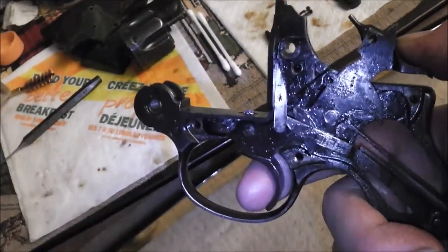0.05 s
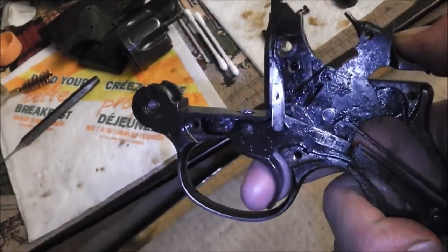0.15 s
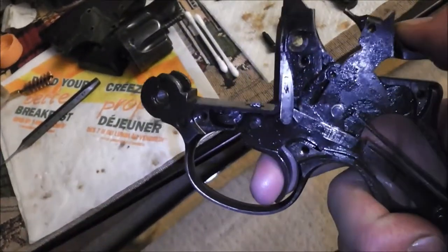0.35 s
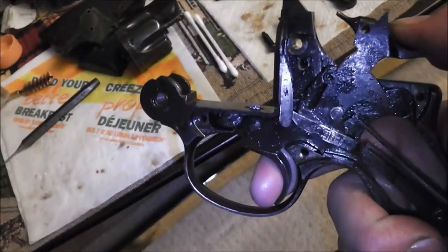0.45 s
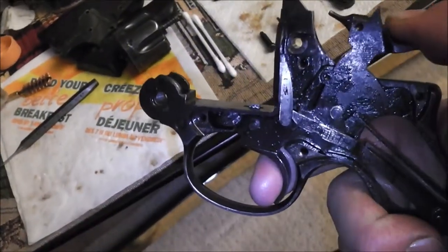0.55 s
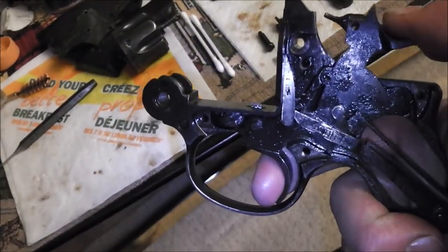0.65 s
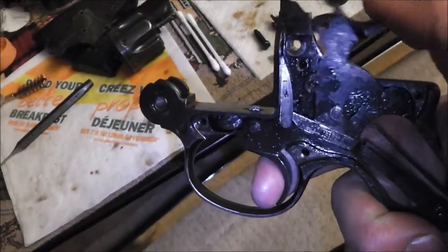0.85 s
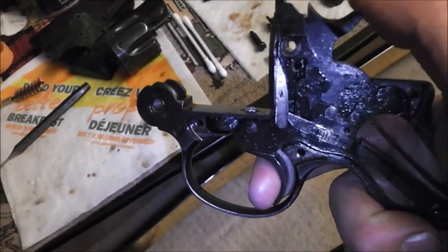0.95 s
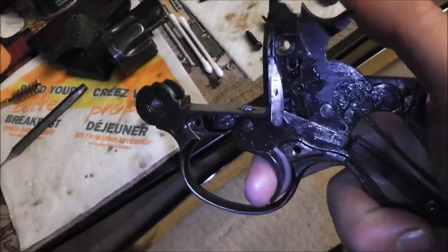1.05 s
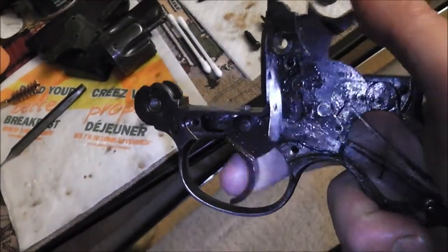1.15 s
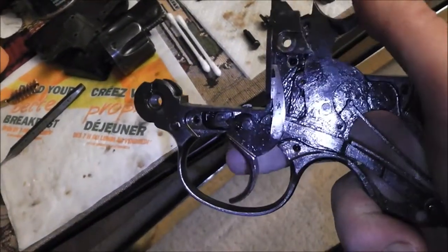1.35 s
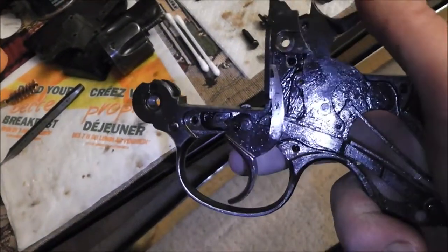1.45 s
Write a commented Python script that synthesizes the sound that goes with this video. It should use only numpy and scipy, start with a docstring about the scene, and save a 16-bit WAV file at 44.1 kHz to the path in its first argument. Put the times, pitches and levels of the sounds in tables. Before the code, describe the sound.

A revolver mechanism, worked by hand, gives one sharp steel click, faint sliding ticks, then two more clicks close together. A spring rings thinly after each, heard up close in a quiet room with a low hum.

```python
"""A steel lock mechanism is cycled by hand in a quiet, humming room. After one faint touch comes a sharp click
at 0.23 s: steel contacts ring the small parts, set a spring singing and knock the frame, and the room answers.
Sliding parts tick faintly around 0.65 s. A short rattle follows a second click at 0.92 s and cuts off as the
room noise drops away; the room noise then creeps back. A brief scrape leads into the third click at 1.2 s, and
the spring sings on."""
import sys
import numpy as np
from scipy import signal
from scipy.fft import rfft, irfft, next_fast_len
from scipy.io import wavfile

SR = 44100
rng = np.random.default_rng(int(sys.argv[2]) if len(sys.argv) > 2 else 0)


def unload_audio(sound):
    """Save the sound as a 16-bit wav file, at the path given as the first command line argument."""
    columns = np.transpose(np.atleast_2d(sound))
    # keep every value between -1 and 1, then stretch to whole-number steps
    steps = np.round(np.clip(columns, -1, 1) * 32767)
    wavfile.write(sys.argv[1], SR, steps.astype(np.int16))


N = 66150
RISE_S = 0.00007  # attack time constant of a hard hit


def amp(db):
    return 10 ** (np.asarray(db) / 20)


def curve_at(points, hz):
    """Reads (f/Hz, value) breakpoints on a log frequency axis."""
    freqs, values = np.transpose(points)
    return np.interp(np.log(hz + 1), np.log(freqs + 1), values)


def envelope(points):
    """Gain through (t/s, level/dB) breakpoints, silent outside them."""
    times, db = np.transpose(points)
    return amp(np.interp(np.arange(N) / SR, times, db, left=-150, right=-150))


def eq(x, response):
    """Filters x by a gain that depends on frequency."""
    size = next_fast_len(N + SR // 2)
    return irfft(rfft(x, size) * response(np.fft.rfftfreq(size, 1 / SR)), size)[..., :N]


def stereo_noise(colour, correlation):
    """Coloured noise of rms 1; (f/Hz, left-right correlation) points set its width."""
    def mid_side_gain(hz):
        angle = np.arccos(np.clip(curve_at(correlation, hz), -1, 1)) / 2
        return colour(hz) * [np.cos(angle), np.sin(angle)]
    mid, side = eq(rng.standard_normal((2, N)), mid_side_gain)
    noise = np.array([mid + side, mid - side])
    return noise / np.sqrt(np.mean(noise ** 2) + 1e-20)


def place(out, start, sound):
    """Mixes a sound into out from start, in seconds."""
    part = out[:, round(start * SR):][:, :sound.shape[-1]]
    part += sound[..., :part.shape[1]]


def ring(modes, t, scatter_db, tilt_db, spread_rad=0, length=1, rise_s=RISE_S):
    """Struck, damped modes; level, pitch and phase vary from hit to hit."""
    hz, db, t60 = np.transpose(modes)[:, :, None]
    level_draw, phase_draw, pitch_draw = rng.standard_normal((len(modes), 3)).T[:, :, None]
    tilt = tilt_db * np.log2(hz / hz[np.argmax(db)])
    level = amp(db + tilt + scatter_db * level_draw - 60 * t / (t60 * length))
    phase = 2 * np.pi * hz * (1 + .015 * pitch_draw) * t + .4 * phase_draw
    lead = spread_rad * (hz / 14000) ** 4 / 2
    stereo = np.array([np.sum(level * np.sin(phase + side * lead), axis=0) for side in (1, -1)])
    return stereo * (1 - np.exp(-t / rise_s)) ** 2


# Fader ride of the room tone: t/s, level/dB
TONE_RIDE = [(0, -46), (.22, -47), (.5, -50), (.92, -49), (.945, -82.5), (1.101, -71.5), (1.301, -70),
             (1.42, -67), (1.5, -61)]
# Colour of its noise: f/Hz, level/dB
TONE_COLOUR = [(20, -2.5), (65, -16), (163, -13.5), (250, -11.5), (446, -14), (825, -13), (1300, -16),
               (2140, -26), (2800, -43), (4420, -25), (14300, -33.5), (16000, -38)]
# Stereo image of its noise: f/Hz, left-right correlation
TONE_IMAGE = [(60, 0.063), (180, -0.26), (550, -0.52), (1650, -0.5), (4970, 0.11), (15000, -0.1)]
# Hum partials: f/Hz, right-channel phase/rad, level/dB before trim and fader
HUMS = [(98.5, .7, -3), (123, .7, -11), (241, .7, -13), (1105, 1.4, -12)]


def room_tone():
    """Noise, hum and low rumble ride one fader, dipping at the second click and creeping back."""
    t = np.arange(N) / SR
    noise = stereo_noise(lambda hz: amp(curve_at(TONE_COLOUR, hz)) * (hz < 15700), TONE_IMAGE)
    hum = sum(amp(db - 2.5) * np.sin(2 * np.pi * hz * t + np.array([[0], [phase]]))
              for hz, phase, db in HUMS)
    rumble = amp(-13.5) * stereo_noise(lambda hz: hz / (1 + (hz / 41.7) ** 4), [(30, 0.06)])
    return envelope(TONE_RIDE) * (noise + hum + rumble)


# Cue of each steel contact: t/s
CONTACT_CUES = [.0263, .2315, .2399, .9174, .9190, .9207, .9231, .9240, .9247, 1.1630, 1.1918, 1.1987,
                1.2060, 1.2072, 1.2103]
# The hit on each cue: level/dB, tilt/(dB per octave), left over right/dB
CONTACTS = [(-43, -11.5, -2), (-11, -4.5, -2.5), (-31, -2.5, -5.5), (-33.5, 4.5, -14), (-30, 0.5, -5),
            (-19, -4, 1), (-14.5, -3, -5), (-16, 2.5, -11.5), (-19, -3, 10), (-43, -2.5, -2.5),
            (-34, -5, -4), (-39, 10, -7.5), (-12, -1.5, -2.5), (-25.5, 8, -19), (-30, -7.5, -7)]
# Modes of the small parts: f/Hz, level/dB, t60/s
STEEL_MODES = [(4290, -16.5, 0.0075), (4704, -12.5, 0.0071), (6310, -11.5, .005), (8520, -4, 0.012),
               (9276, 2, 0.0073), (9975, -4, 0.009), (10970, -3, 0.011), (12350, -8, 0.0072),
               (13180, -7.5, 0.0082), (14080, 1.5, 0.004), (15100, -12, .004)]
CRACK_DB, CRACK_T60_S, CRACK_HZ, CRACK_WIDTH_HZ = 10.5, .003, 11000, 7000
SPREAD_RAD = 2.4  # phase between left and right at 14 kHz


def steel_contacts():
    """Each contact rings the small parts with a bright crack; weak ones start softer and crack less."""
    def crack_band(hz):
        band = 1j * hz * CRACK_WIDTH_HZ / (CRACK_HZ ** 2 - hz ** 2 + 1j * hz * CRACK_WIDTH_HZ)
        return band * np.exp(.5j * SPREAD_RAD * (hz / 14000) ** 4 * np.array([[1], [-1]]))
    rings, cracks = np.zeros((2, 2, N))
    t = np.arange(SR // 20) / SR
    hardest_db = max(CONTACTS)[0]
    for start, (db, tilt_db, pan_db) in zip(CONTACT_CUES, CONTACTS):
        gain = amp(db + np.array([[pan_db / 2], [-pan_db / 2]]))
        soften_db = .3 * (hardest_db - db)
        rise_s = RISE_S * amp(soften_db)
        place(rings, start, gain * ring(STEEL_MODES, t, 1.5, tilt_db, SPREAD_RAD, rise_s=rise_s))
        burst = amp(CRACK_DB - soften_db - 60 * t / CRACK_T60_S) * (1 - np.exp(-t / rise_s)) ** 2
        place(cracks, start, gain * burst * rng.standard_normal(len(t)))
    return rings + eq(cracks, crack_band)


# Strikes on the spring: t/s, level/dB before trim, t60/s
SPRING_STRIKES = [(0.231, -43, 1.08), (.935, -56.5, 3.7), (1.206, -57, 4.8)]
SPRING_HZ = 7264


def singing_spring():
    """The spring sings in one pure mode, retriggered by each click."""
    level, t = np.zeros(N), np.arange(N) / SR
    stops = [strike[0] for strike in SPRING_STRIKES[1:]] + [N / SR]
    for (start, db, t60), stop in zip(SPRING_STRIKES, stops):
        attack = 1 - np.exp(-abs(t - start) / 0.001)
        level += (t >= start) * (t < stop) * amp(db + 2 - 60 * (t - start) / t60) * attack
    tone = np.sin(2 * np.pi * SPRING_HZ * t + np.array([[0], [.3]]))
    return level * tone * amp([[-1], [1]])  # a little to the right


# Modes of the frame: f/Hz, level/dB, t60/s
FRAME_MODES = [(940, 2.5, 0.0064), (1246, -3, .01), (1625, 0.5, 0.0069), (2120, -16.5, 0.013)]
# Knocks: t/s, ring level/dB, tilt/(dB per octave), ring length factor, width (0 mid, 1 side),
# thump level/dB, thump f/Hz, thump t60/s
KNOCKS = [(0.2317, -14, -4, 1.34, 0.03, -19.5, 89.6, 0.058),
          (0.9215, -19, -9, 1.76, 0.16, -25, 260.7, 0.027), (0.9228, -19, -8, .7, 0.95, -8.5, 762, 0.0065),
          (1.2055, -27.5, 10, 1.26, 0.22, -11, 206, 0.0025)]


def frame_knocks():
    """The hard blows ring the frame and thump through the hands."""
    out, t = np.zeros((2, N)), np.arange(SR // 8) / SR
    for start, db, tilt_db, length, width, thump_db, thump_hz, thump_t60 in KNOCKS:
        attack = 1 - np.exp(-t / (0.016 * thump_t60))
        thump = -amp(thump_db - 60 * t / thump_t60) * np.cos(2 * np.pi * thump_hz * t) * attack
        mid, side = (amp(db) * ring(FRAME_MODES, t, 1, tilt_db, length=length) + thump for _ in range(2))
        angle = width * np.pi / 2
        place(out, start, np.cos(angle) * mid + np.sin(angle) * side * [[1], [-1]])
    return out


# Reverb tail of each click: t/s, level/dB
TAILS = [(0.232, -46.5), (0.9231, -51), (1.205, -50.5)]
# Colour of the tails: f/Hz, level/dB
TAIL_COLOUR = [(300, -29), (600, -27), (1400, 1), (3000, -7), (4500, -1), (6600, -3), (9900, -1),
               (13000, -7.5), (15500, -16), (16200, -50)]
# Decay of the room: f/Hz, t60/s
ROOM_DECAY = [(500, 0.26), (3000, 0.21), (9000, .3), (15000, 0.29)]


def room_tails():
    """The room answers each click after a 3 ms pre-delay; each frequency dies at its own speed."""
    out = np.zeros((2, N))
    for start, db in TAILS:
        noise = stereo_noise(lambda hz: amp(curve_at(TAIL_COLOUR, hz)), [(500, 0.3), (9000, 1.0)])
        hz, t, bands = signal.stft(noise[:, :SR // 2], SR, nperseg=256)
        decay = amp(-60 * t / curve_at(ROOM_DECAY, hz)[:, None])
        _, tail = signal.istft(bands * decay, SR, nperseg=256)
        place(out, start + .003, amp(db) * tail)
    return out


# Ticks of sliding parts: t/s, level/dB
TICKS = [(.6120, -34), (0.62, -42), (0.621, -39.5), (0.637, -41), (0.648, -39), (0.654, -41), (.6600, -54),
         (.6828, -47), (0.6985, -49.5)]
# Two scrape swells, each a list of: t/s, level/dB
SCRAPES = [
    [(.605, -72), (.625, -63), (.655, -57.5), (.70, -68)],
    [(1.163, -80.5), (1.178, -69.5), (1.19, -49.5), (1.205, -39.5), (1.207, -66)],
]
TICK_T60_S, SLIDE_HZ, SLIDE_WIDTH_HZ = 0.0049, 11110, 3100


def sliding_parts():
    """Parts slip past each other with faint treble ticks and soft scrapes."""
    level, t = np.zeros((2, N)), np.arange(SR // 50) / SR
    for start, db in TICKS:
        place(level, start, amp(db - 60 * t / TICK_T60_S) * (1 - np.exp(-t / RISE_S)))
    level += sum(envelope(scrape) for scrape in SCRAPES)
    hiss = stereo_noise(lambda hz: np.exp(-((hz - SLIDE_HZ) / SLIDE_WIDTH_HZ) ** 2), [(9000, 0.75)])
    return level * hiss * amp([[-3], [3]])  # to the right


# Envelope of the rattle: t/s, level/dB
RATTLE_SHAPE = [(.923, -93), (0.929, -38), (0.937, -37.5), (0.947, -42), (0.954, -70.5), (.965, -73.5)]
# Its colour: f/Hz, level/dB
RATTLE_COLOUR = [(88, -47), (150, -8.5), (905, 1), (3350, -15), (4490, -4.5), (10200, -4), (14800, -6.5),
                 (16000, -24)]


def rattle():
    """A short rattling hash follows the second click and cuts off as the room noise drops away."""
    noise = stereo_noise(lambda hz: amp(curve_at(RATTLE_COLOUR, hz)), [(300, 0.38), (9000, 1.0)])
    return envelope(RATTLE_SHAPE) * noise


def scene():
    """Mixes the layers in order of entry."""
    return (room_tone() + steel_contacts() + singing_spring() + frame_knocks() + room_tails()
            + sliding_parts() + rattle())


def record(dry):
    """The microphone rolls off the top treble, and a steep high cut ends it."""
    fade_hz, fade_db_per_khz, cut_hz = 15700, -16, 16950
    def top_end(hz):
        fade = amp(fade_db_per_khz * np.clip(hz - fade_hz, 0, None) / 1000)
        return fade * np.clip((cut_hz - hz) / 250, 0, 1) ** 2
    return eq(dry, top_end)


dry = scene()
out = record(dry)
unload_audio(out)
```